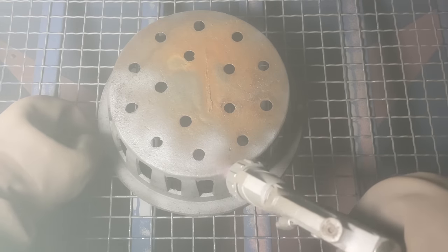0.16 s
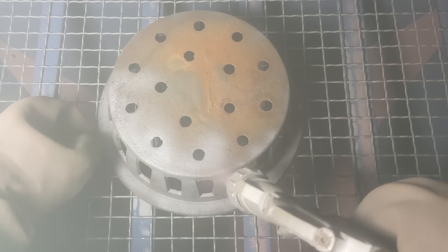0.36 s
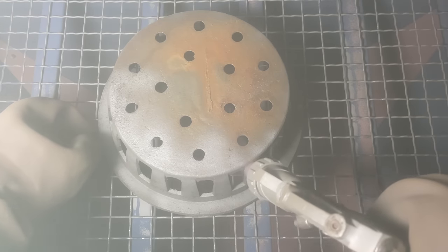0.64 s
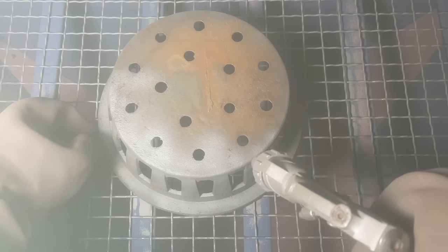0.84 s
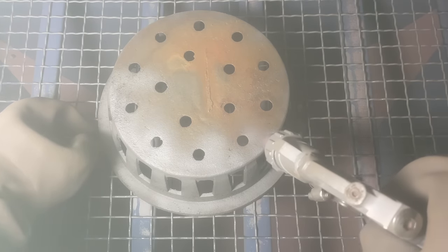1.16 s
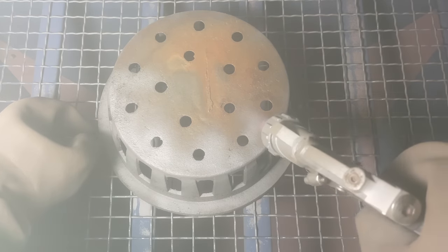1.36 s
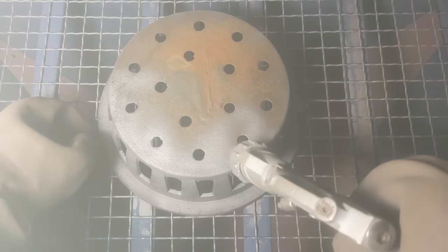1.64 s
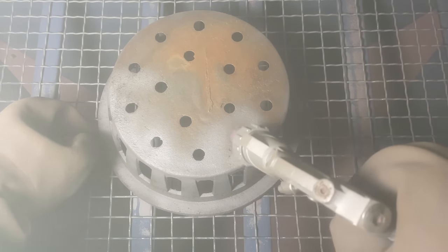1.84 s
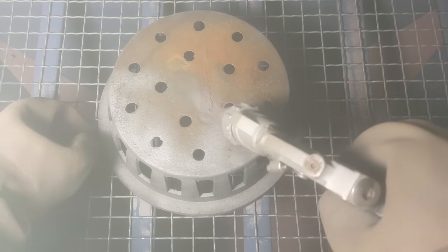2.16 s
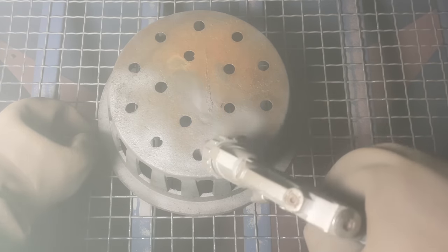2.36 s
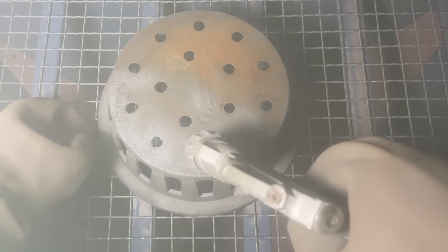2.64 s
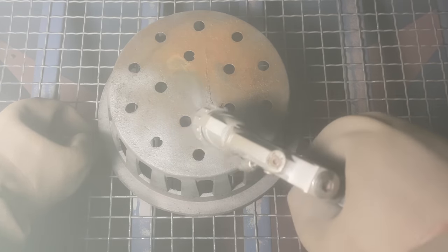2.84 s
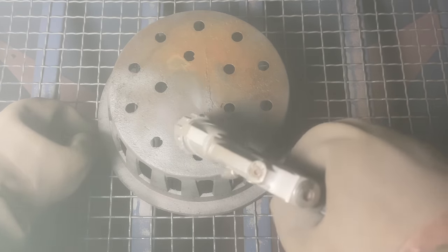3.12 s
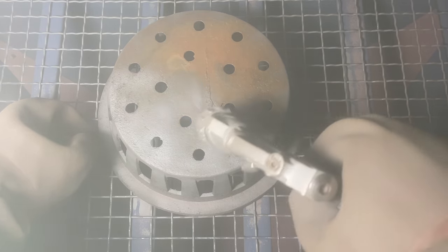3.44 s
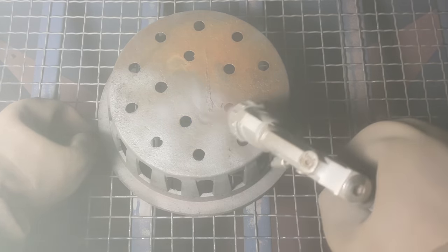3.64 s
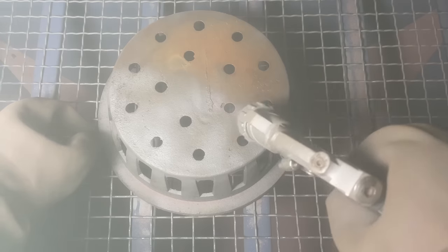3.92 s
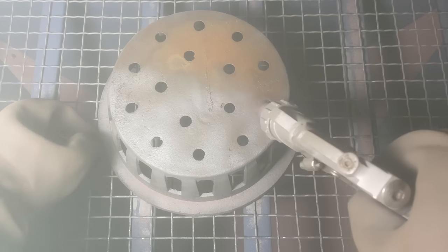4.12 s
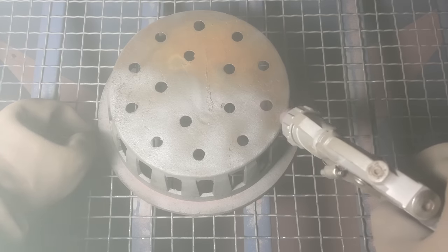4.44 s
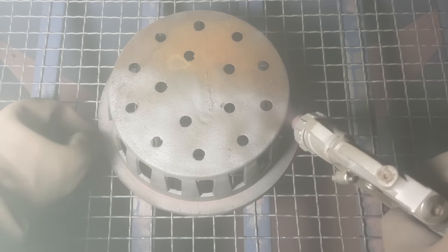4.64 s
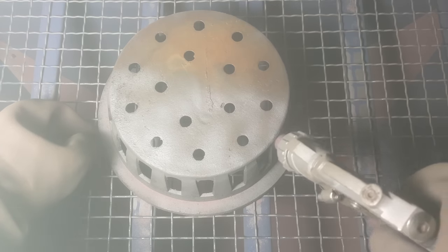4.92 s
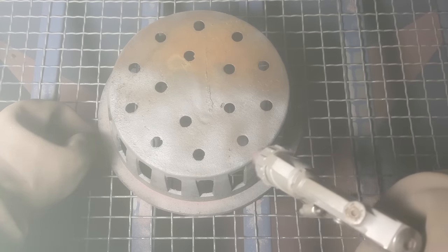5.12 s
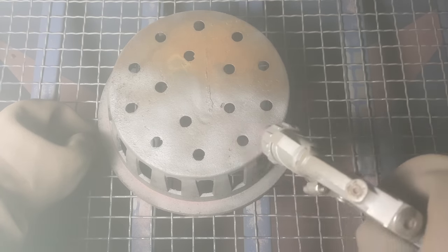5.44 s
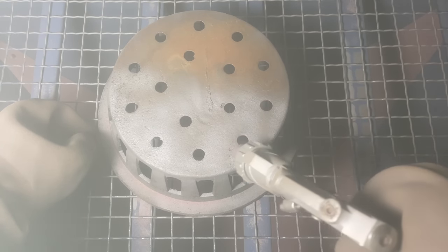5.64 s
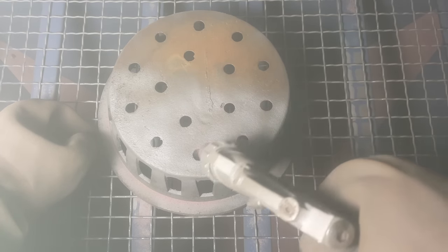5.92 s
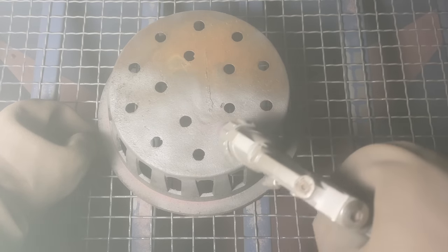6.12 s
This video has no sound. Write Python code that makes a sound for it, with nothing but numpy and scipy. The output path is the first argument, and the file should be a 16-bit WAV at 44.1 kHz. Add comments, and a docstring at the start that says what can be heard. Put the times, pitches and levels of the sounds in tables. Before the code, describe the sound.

Close, harsh rush of compressed air and grit scouring perforated steel, surging in slugs and flaring over holes, with soft low puffs of wind.

```python
"""Inside a steel blasting cabinet, a blast gun strips rust from a perforated steel dome.
The two-port microphone is close enough for deflected air to buffet it; the dust extractor hums behind.
The nozzle hisses and the grit comes in slugs; air and grit roar on the steel and flare on its holes and rim.
Sources are noise, grain ticks and sines; all but the two sines take the colour of the box's resonances."""
import sys
import numpy as np
from scipy import signal
from scipy.fft import rfft, irfft, next_fast_len
from scipy.io import wavfile
from scipy.ndimage import uniform_filter1d, map_coordinates

SR = 44100
rng = np.random.default_rng(int(sys.argv[2]) if len(sys.argv) > 2 else 0)


def dump_mix(stems):
    """Bounce the given channels to the path in sys.argv[1] as a 16-bit WAV at rate SR."""
    frames = np.atleast_2d(stems).T  # one column per channel
    limited = np.clip(frames, -1, 1)  # hard clip at full scale
    pcm = np.round(limited * 32767).astype(np.int16)
    wavfile.write(sys.argv[1], SR, pcm)


N = 276595

# Tabled levels, lifts and spectra are relative: each function adds its own trim or scaling.


def amp(db):
    """Decibels to gain."""
    return 10 ** (np.asarray(db) / 20)


def unit(x):
    """Scale to rms 1."""
    return x / np.sqrt(np.mean(x ** 2) + 1e-20)


def along(points, hz):
    """Read (frequency [Hz], value) points on a log frequency axis."""
    f, v = np.transpose(points)
    return np.interp(np.log(hz + 1), np.log(f + 1), v)


def curves(rows):
    """One value per sample for each column after the time [s]."""
    s, *cols = np.transpose(rows)
    t = np.arange(N) / SR
    return [np.interp(t, s, c) for c in cols]


def wobble(rate):
    """A smooth random curve with the given number of knots a second."""
    knots = rng.standard_normal(int(N * rate / SR) + 4)
    return map_coordinates(knots, [np.arange(N) * rate / SR])


def swell(middle, length, rise, fall):
    """A smooth rise, hold and fall [s], length taken at half height; a short one peaks below 1."""
    t = np.arange(N) / SR - middle
    inside = np.minimum((length / 2 + t) / rise, (length / 2 - t) / fall)
    return .5 + .5 * np.sin(np.pi * np.clip(inside, -.5, .5))


def filtered(x, response):
    """Filter x by a complex response of frequency."""
    size = next_fast_len(N + SR // 2)
    hz = np.fft.rfftfreq(size, 1 / SR)
    return irfft(rfft(x, size) * response(hz), size)[..., :N]


def turbulence(patchy_db=1.86):
    """Two unrelated noises whose shared colour drifts in patches as the moving gun shifts the reflections."""
    z = signal.stft(rng.standard_normal((2, N)), nperseg=1024)[2]
    field = rng.standard_normal(z.shape[1:])
    field = uniform_filter1d(field, size=4, axis=0)  # across frequency
    field = uniform_filter1d(field, size=12, axis=1)  # across time
    return signal.istft(z * amp(patchy_db * unit(field)), nperseg=1024)[1][:, :N]


def grainy(grains_per_s, grain_db):
    """Turbulence peppered with the ticks of single grains, at random moments."""
    struck = rng.random(N) < grains_per_s / SR
    ticks = unit(turbulence() * struck)
    return turbulence() + amp(grain_db) * ticks


def ringing(pitch_hz, width_hz):
    """Narrow stereo noise of rms 1, carried to a pitch given for every sample."""
    narrow = filtered(turbulence(), lambda hz: 1 / (1 + (2 * hz / width_hz) ** 4))
    carrier = np.sin(2 * np.pi * np.cumsum(pitch_hz) / SR)
    return unit(narrow * carrier)


# Resonances and nulls of the box and the part: (frequency [Hz], width [Hz], lift [dB])
MODES_BOX = [(230, 30, 2.3), (256, 18, 6.5), (283, 20, -2.6), (310, 24, -2.5), (339, 16, 3.5),
             (385, 36, -1), (424, 26, 4), (545, 20, 3.3), (728, 26, 3), (819, 44, 5.5), (905, 40, -3.5),
             (962, 26, 4.5), (1040, 48, 5.8), (1130, 70, 4.3), (1196, 18, -3.5), (1220, 16, 4),
             (1309, 32, 6.3), (1415, 18, 7.3), (1476, 16, 2), (1567, 22, 6.3), (1762, 34, 5), (1835, 60, 3),
             (1940, 24, -2.3), (2040, 44, 2.3), (2133, 34, 2.3), (2235, 60, 2.5), (2315, 36, -2),
             (2380, 56, 2), (2480, 90, 2.2), (2574, 30, -2.3), (2623, 40, 2.8), (2715, 80, 3.5),
             (2820, 44, -2.5), (2885, 40, 1.8), (3020, 100, 1.3), (3175, 30, -1.5), (3236, 24, 3.8),
             (3282, 30, 3.5), (3355, 30, 2.3), (3460, 50, 1.5), (3590, 54, 4), (5150, 200, -1.8),
             (5380, 150, 2), (5850, 130, 1.3), (6200, 110, 1.6), (7100, 240, 1.2)]


def cabinet(hz, resonance=1.47):
    """Gain of the steel box: strong resonances and nulls over a fine random ripple of weak ones."""
    lift = sum(db / (1 + (2 * (hz - centre) / width) ** 2) for centre, width, db in MODES_BOX)
    ripple = map_coordinates(rng.standard_normal(size=4096), [hz / 16], mode="mirror")  # a knot every 16 Hz
    depth_db = along([(400, .3), (1000, .7), (1700, 1), (2200, 1.3), (3300, 1.2), (6000, 1.9)], hz)
    return amp(resonance * lift + depth_db * ripple)


# Likeness of the two microphone ports: (frequency [Hz], correlation [0-1])
ALIKE = [(100, .98), (330, .93), (450, .78), (650, .15), (880, .2), (1040, .68), (1170, .47), (1400, .8),
         (1800, .75), (2200, .93), (3100, .8), (4200, .62), (5100, .57), (6000, .9), (6900, .72),
         (8200, .98), (9900, .65), (11000, .88), (13500, .88), (15000, .99)]
# Balance of the ports: (frequency [Hz], left minus right [dB])
BALANCE_DB = [(230, 0), (310, 4.5), (700, 3), (830, 6), (1030, 1.5), (1550, 1), (1800, 5), (2400, 8.5),
              (3300, 7), (4000, 4.5), (5000, 5), (6200, 2.5), (7800, 0)]
# Phase between the ports: (frequency [Hz], lead of the left [rad])
LEAD = [(300, 0), (1200, -.3), (2000, 0), (2600, .4), (3500, .5), (4000, 0), (4850, 1.05), (5800, 0),
        (6700, -.95), (7400, -2.1), (8000, -3), (8600, -3.3), (9700, -4.6), (10600, -6.2), (12600, -6.4),
        (14200, -9.4)]


def heard(pair, spectrum):
    """A noise pair coloured by source and box, as the two ports get it; their mean has rms 1."""
    def colour(hz):
        turn = np.arccos(np.clip(along(ALIKE, hz), 0, 1)) / 2
        shares = np.array([np.cos(turn), np.sin(turn)])  # what the ports share, and what parts them
        return amp(along(spectrum, hz)) * cabinet(hz) * shares

    def ports(hz):
        half = amp(along(BALANCE_DB, hz) / 2) * np.exp(1j * along(LEAD, hz) / 2)
        return np.array([half, 1 / half])

    common, apart = filtered(pair, colour)
    both = filtered(np.array([common + apart, common - apart]), ports)
    return both / np.std(both.mean(axis=0))


# Jet crossing a hole or an edge: (middle [s], length [s], flare [dB], note pitch [Hz],
# note level [dB], level of the roar from the hollow [dB])
HOLES = [(1.028, 0.071, 2, 3050, -35.5, -33), (3.535, 0.079, 7.5, 3660, -31.5, -30),
         (3.842, 0.17, 2.5, 3400, -34.5, -26.5), (3.989, .11, 4, 3420, -42, -29.5),
         (4.394, 0.098, 2.5, 3210, -32.5, -32), (4.489, .08, 2, 3090, -36, -38),
         (4.82, 0.097, -0.5, 3070, -42, -50), (5.101, 0.15, .5, 2950, -42, -33)]
HOLE_RISE_S, HOLE_FALL_S = 0.045, 0.038


def flare():
    """Change in dB as the jet cuts across a hole or an edge; it builds, then stops a little faster."""
    return sum(flare_db * swell(s, length, HOLE_RISE_S, HOLE_FALL_S) for s, length, flare_db, *_ in HOLES)


# Slugs of grit: (middle [s], length [s], surge [dB], dip before it [dB])
SLUGS = [(.1, .3, 2.5, 0), (.89, .3, 5.8, 2), (1.82, .21, 7, 3), (2.87, .22, 5, 4.5), (3.83, .19, 4, 1.5),
         (4.44, .12, 4.8, .5), (4.96, .12, 5.5, .3), (5.72, .15, 5, 1)]
CHOKE_LEAD_S, CHOKE_S, SLUG_RISE_S, SLUG_FALL_S = .12, .12, .27, .19


def feed():
    """Grit flow in dB about its steady rate: a slug chokes the hose, then builds slowly and ends faster."""
    flow_db = np.zeros(N)
    for s, length, surge_db, dip_db in SLUGS:
        choke_s = s - length / 2 - CHOKE_LEAD_S
        flow_db -= dip_db * swell(choke_s, CHOKE_S, SLUG_FALL_S, SLUG_FALL_S)
        flow_db += surge_db * swell(s, length, SLUG_RISE_S, SLUG_FALL_S)
    return flow_db


# Spectrum of the extractor's rush: (frequency [Hz], level [dB])
DUCT = [(20, -47), (60, -15), (110, -4), (150, -9), (180, -2), (220, 1.5), (300, 2.5), (350, 4),
        (500, -6.5), (750, -5.5), (1500, -56)]
# Hum of the extractor: (time [s], pitch [Hz], level [dB])
HUM = [(0, 310.3, -44), (.9, 311.2, -44.5), (2.3, 311.3, -43.5), (2.75, 313.7, -44.3), (3.55, 310, -43),
       (3.83, 306.5, -45), (4.0, 309, -41.5), (4.13, 313, -45.5), (4.3, 310.3, -44), (4.9, 308, -41),
       (5.02, 305.5, -46), (5.3, 308.5, -43), (5.55, 312.3, -45.5), (6.27, 310.3, -44.5)]


def extractor(duct_db=-43.5, hum_trim_db=-1.54, drift=0.0025, pan_db=2):
    """The dust extractor: a low rush and one hum near 310 Hz, its sine wavered as if blurred by noise around it."""
    hum_hz, hum_db = curves(HUM)
    phase = 2 * np.pi * np.cumsum(hum_hz * (1 + drift * wobble(6))) / SR
    hum = amp(hum_db + hum_trim_db) * unit(np.sin(phase))
    rush = amp(duct_db) * heard(turbulence(patchy_db=1.0), DUCT)
    return rush + hum * amp(np.array([[pan_db], [-pan_db]]))


# Spectrum of air striking the microphone: (frequency [Hz], level [dB])
BUFFET = [(12, 5), (30, -12), (58, 4.5), (110, 2.5), (170, -3), (300, -18), (800, -61)]
# Puffs of deflected air at the microphone: (middle [s], length [s], level [dB])
PUFFS = [(0.1, .07, -38), (0.36, 0.12, -42.3), (.83, 0.17, -54), (1.002, 0.084, -48), (1.17, 0.23, -46),
         (1.632, 0.17, -43.5), (1.8, .13, -49), (2.48, .05, -44), (2.58, 0.087, -43), (2.755, 0.12, -41),
         (2.923, 0.15, -42), (3.06, 0.11, -46), (3.86, 0.08, -42.5), (5.28, 0.17, -52), (5.47, .13, -51),
         (5.7, .13, -48)]
PUFF_RISE_S, PUFF_FALL_S, DRAUGHT_DB = 0.07, 0.11, -78


def buffeting(level_db=0.0, lumps_db=-2.3):
    """Air thrown back by the part reaches the microphone in low, lumpy puffs over a faint draught."""
    puffs = sum(amp(db) * swell(s, length, PUFF_RISE_S, PUFF_FALL_S) for s, length, db in PUFFS)
    draught = amp(DRAUGHT_DB) + puffs
    return draught * amp(level_db + lumps_db * wobble(45)) * heard(turbulence(patchy_db=.6), BUFFET)


# The box's hollow resonance: (time [s], level [dB])
DRONE = [(0, -48), (.36, -44), (.5, -47), (.9, -46), (1.02, -55), (1.35, -39.5), (1.46, -60), (1.65, -49),
         (2.2, -43), (2.6, -60), (2.82, -42), (3.12, -42), (3.28, -56), (3.74, -39.5), (4.05, -57.5),
         (4.3, -56.5), (4.42, -48), (5.12, -58), (5.65, -51), (6.27, -49)]
DRONE_HZ = 420


def drone(level_db=-4.0, wander_hz=4, wander_rate=18, pan_db=2):
    """Moving air keeps one hollow resonance of the box sounding: a sine, unsteady in pitch."""
    drone_db, = curves(DRONE)
    phase = 2 * np.pi * np.cumsum(DRONE_HZ + wander_hz * wobble(wander_rate)) / SR
    return amp(drone_db + level_db) * unit(np.sin(phase)) * amp(np.array([[pan_db], [-pan_db]]))


# Air whirling in the box: (time [s], level [dB])
SWIRL = [(0, -38), (.3, -35.5), (.42, -38.5), (.85, -36), (1.05, -38), (1.45, -34.5), (1.85, -36),
         (2.15, -35), (2.45, -36.5), (2.95, -33.5), (3.28, -39), (3.45, -36), (3.9, -35.5), (4.15, -38),
         (4.4, -37), (4.6, -41), (4.82, -39.5), (5.1, -38), (5.8, -36.5), (6.27, -35.5)]
# Spectrum of the whirling air: (frequency [Hz], level [dB])
WHIRL = [(200, -43), (450, -2), (650, -5.5), (900, -5.5), (1100, -1.5), (1600, -4), (2000, -4.5),
         (3200, -57)]


def swirl(level_db=0, flare_share=0.32, eddy_db=0.2, eddy_rate=10):
    """Spent air whirls round the box and stirs its hollow resonances, more so when the jet flares."""
    swirl_db, = curves(SWIRL)
    air_db = swirl_db + level_db + flare_share * flare() + eddy_db * wobble(eddy_rate)
    return amp(air_db) * heard(turbulence(patchy_db=1.24), WHIRL)


# Thin squeals of the nozzle: (middle [s], length [s], pitch [Hz], level [dB])
SQUEALS = [(.76, .2, 6980, -44), (2.787, 0.12, 7050, -36), (2.96, .13, 7230, -45),
           (3.496, 0.17, 7130, -37.5), (4.462, 0.15, 7250, -48), (4.73, 0.07, 7320, -40),
           (5.231, 0.24, 7000, -40)]
SQUEAL_EDGE_S = 0.063


def squeals(width_hz=280, level_db=-5):
    """Now and then the nozzle's hiss narrows to a thin, airy squeal: narrow noise of gliding pitch."""
    pitch_hz, = curves([(s, hz) for s, _, hz, _ in SQUEALS])
    strength = sum(amp(db + level_db) * swell(s, length, SQUEAL_EDGE_S, SQUEAL_EDGE_S)
                   for s, length, _, db in SQUEALS)
    return strength * heard(ringing(pitch_hz, width_hz), NOZZLE)


# Spectrum of the fine spray: (frequency [Hz], level [dB])
SPRAY = [(6800, -30), (7800, -6), (8300, -4), (8700, -1), (9150, 0), (9800, -6.5), (10300, -10),
         (11000, -8.5), (12000, -12), (13100, -11.5), (14400, -15), (15500, -9)]
# Treble of the spray: (time [s], level [dB])
TREBLE = [(0, -47), (.42, -50), (.7, -47), (.9, -45), (1.1, -47.5), (1.45, -44), (1.6, -47.5), (1.86, -44),
          (2.1, -44.5), (2.46, -44.5), (2.62, -46.5), (2.88, -43), (3.3, -46.5), (3.45, -42.5),
          (3.6, -46.5), (3.82, -43), (4.25, -49), (4.75, -48), (5.5, -47), (5.77, -45), (6.27, -46)]


def spray(level_db=0.0, flutter_db=1.5, flutter_rate=110, grains_per_s=10000, grain_db=-5):
    """The finest grit and dust sizzle above the hiss, as fluttering grainy noise."""
    treble_db, = curves(TREBLE)
    sizzle_db = treble_db + level_db + flutter_db * wobble(flutter_rate)
    return amp(sizzle_db) * heard(grainy(grains_per_s, grain_db), SPRAY)


# Spectrum of the hollow under the dome: (frequency [Hz], level [dB])
CAVITY = [(700, -25), (1200, -9), (1850, -1.5), (2250, 3), (2700, -3), (3600, -34)]


def cavity(level_db=-1, grains_per_s=2000, grain_db=-3):
    """Through a hole the jet blows into the hollow under the dome, which roars lower and coarser."""
    strength = sum(amp(db + level_db) * swell(s, length, HOLE_RISE_S, HOLE_FALL_S)
                   for s, length, *_, db in HOLES)
    return strength * heard(grainy(grains_per_s, grain_db), CAVITY)


# Colour of the notes from holes and edges: (frequency [Hz], level [dB])
EDGE = [(1500, 4), (2100, -1.5), (3000, 9), (3700, -11)]


def holes(width_hz=440, level_db=-2):
    """Each hole or edge that the jet crosses sounds a brief, airy note of its own."""
    notes = 0
    for s, length, _, hz, db, _ in HOLES:
        strength = amp(db + level_db) * swell(s, length, HOLE_RISE_S, HOLE_FALL_S)
        notes = notes + strength * ringing(np.full(N, hz), width_hz)
    return np.std(notes) * heard(notes, EDGE)  # colouring keeps the overall level


# Spectrum of the rasp, also of the impact's ring: (frequency [Hz], level [dB])
RASP = [(900, -30), (1500, -8), (1900, -3.5), (2500, -4), (3000, 7.5), (3550, 3.5), (3900, 0),
        (4800, -12.5), (9000, -37)]


def edges(level_db=-35.0, jet_share=0.43, flare_share=1.0, feed_share=0.27, sputter_db=0.4, sputter_rate=120):
    """A broad, sputtering rasp follows the roar and the grit feed, and flares on holes and the rim."""
    roar_db, = curves(JET)
    rasp_db = level_db + jet_share * (roar_db - roar_db.mean())
    rasp_db = rasp_db + flare_share * flare() + feed_share * feed()
    return amp(rasp_db + sputter_db * wobble(sputter_rate)) * heard(turbulence(), RASP)


# Spectrum of the grit: (frequency [Hz], level [dB])
GRIT = [(2000, -30), (3300, -8), (4100, 0), (5000, 0), (6200, -4), (7300, -3.5), (8300, -7.5), (9200, -6.5),
        (10200, -17), (15500, -21)]
# Spectrum of the nozzle's air, also of its squeals: (frequency [Hz], level [dB])
NOZZLE = [(4000, -30), (5200, -12), (5800, -2.7), (6250, 0), (6800, -6.5), (7150, -4), (7700, -8),
          (8400, -13), (9100, -14), (10200, -25), (15500, -34)]
# The nozzle's hiss: (time [s], level [dB])
HISS = [(0, -33.5), (.3, -37), (.55, -34.5), (.76, -32.5), (1.15, -34.5), (1.4, -33), (1.6, -35.7),
        (1.92, -33), (2.42, -32.5), (2.63, -38), (2.78, -32), (3.1, -32.5), (3.33, -35), (3.5, -34.8),
        (3.63, -38.5), (3.8, -32.5), (4.3, -35), (4.6, -34), (4.9, -36), (5.23, -34), (5.48, -36.5),
        (5.78, -32.5), (6.27, -34.5)]


def gun(grit_db=-39, hiss_db=-2.63, grains_per_s=9000, grain_db=-3, grit_flutter_db=0.7,
        air_flutter_db=0.73, uneven_db=0.96, uneven_rate=25, hiss_follows=0.018, flare_share=0.42):
    """Air hisses out with thousands of ticking grains a second; grit follows the feed, air barely does."""
    nozzle_db, = curves(HISS)
    flow_db = feed()
    grains_db = grit_db + flow_db + flare_share * flare() + grit_flutter_db * wobble(60)
    grit = amp(grains_db) * heard(grainy(grains_per_s, grain_db), GRIT)
    air_db = nozzle_db + hiss_db + hiss_follows * flow_db
    air_db = air_db + uneven_db * wobble(uneven_rate) + air_flutter_db * wobble(70)
    return grit + amp(air_db) * heard(turbulence(), NOZZLE)


# Brief surges of the roar: (middle [s], lift [dB])
SURGES = [(4.04, 3), (4.265, 3), (4.364, 4), (4.652, 4.5), (4.913, 1), (5.05, 0), (5.41, 4), (5.51, 3),
          (5.607, 2.5)]
SURGE_S, SURGE_EDGE_S = 0.013, 0.015


def surges():
    """Decibels by which brief surges lift the roar."""
    return sum(db * swell(s, SURGE_S, SURGE_EDGE_S, SURGE_EDGE_S) for s, db in SURGES)


# Spectrum of the roar on the steel: (frequency [Hz], level [dB])
ROAR = [(900, -34.5), (1600, -16), (1800, -6.5), (2100, 0.5), (2450, -2), (2850, -7), (3400, -26),
        (5500, -77)]
# The gap between nozzle and steel tunes the roar: (time [s], pitch [Hz])
GAP = [(0, 2510), (.4, 2480), (.63, 2380), (1.07, 2205), (2.15, 2290), (2.4, 2480), (2.7, 2520),
       (3.25, 2550), (3.45, 2480), (3.67, 2180), (4.02, 2065), (4.23, 2224), (4.9, 2370), (5.5, 2124),
       (5.92, 2485), (6.27, 2302)]
# How squarely the jet meets the dome: (time [s], roar level [dB])
JET = [(0, -24), (.35, -27), (.46, -27), (.6, -27.5), (.93, -27.5), (1.08, -25), (1.6, -28.5), (2.17, -30),
       (2.29, -25.5), (2.7, -27.5), (2.87, -25.5), (2.95, -27.5), (3.22, -26), (3.34, -28.5), (3.46, -28.5),
       (3.64, -29), (3.88, -27.5), (4.15, -29), (4.3, -27), (4.4, -28.5), (4.5, -30), (4.58, -31.5),
       (4.7, -29), (4.93, -26.5), (5.0, -30), (5.12, -28), (5.27, -28.5), (5.5, -28), (5.72, -28.5),
       (6.11, -26), (6.18, -30), (6.27, -29)]


def impact(level_db=-2.5, focus_db=-6.0, focus_width_hz=640, ring_db=-10.0, ring_width_hz=380,
           flutter_db=-0.2, flutter_rate=90, sway_db=0.2, sway_rate=16, coarse_per_s=2200, coarse_db=-5):
    """The jet breaks up on the steel; the gap under the nozzle focuses its swaying, fluttering roar and rings."""
    roar_db, = curves(JET)
    gap_hz, = curves(GAP)
    roar = amp(level_db) * heard(grainy(coarse_per_s, coarse_db), ROAR)
    focus = amp(focus_db) * heard(ringing(gap_hz, focus_width_hz), ROAR)
    ring = amp(ring_db) * heard(ringing(gap_hz, ring_width_hz), RASP)
    sway = sway_db * wobble(sway_rate)  # with the hand
    flutter = flutter_db * wobble(flutter_rate)  # with coarse grit
    return amp(roar_db + flare() + surges() + sway + flutter) * (roar + focus + ring)


def scene():
    """Everything sounds at once inside the cabinet."""
    background = extractor() + buffeting() + drone() + swirl()
    blast = squeals() + spray() + cavity() + holes() + edges() + gun() + impact()
    return background + blast


TOP_HZ = 15730


def record(dry):
    """The microphone's signal is cut off sharply above the band limit."""
    return filtered(dry, lambda hz: hz < TOP_HZ)


dry = scene()
out = record(dry)
dump_mix(out)
```